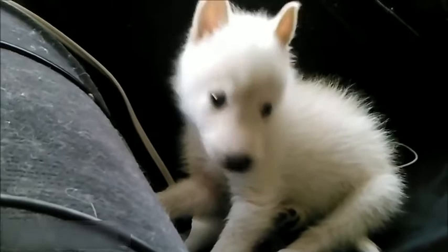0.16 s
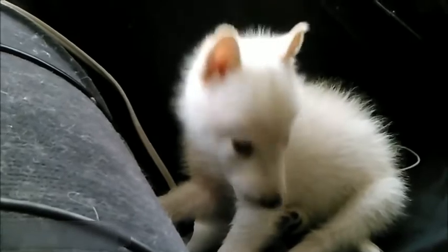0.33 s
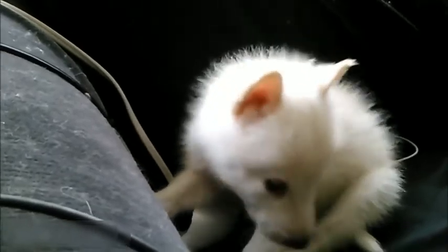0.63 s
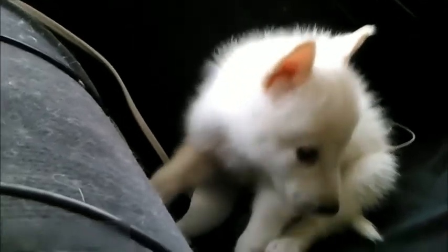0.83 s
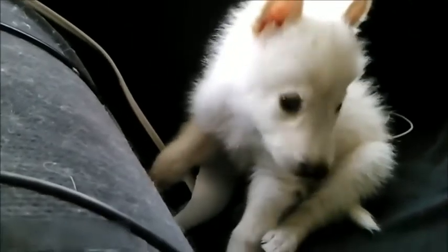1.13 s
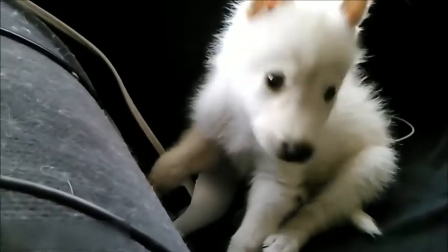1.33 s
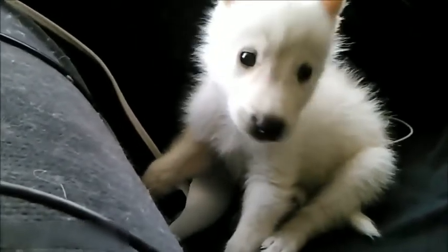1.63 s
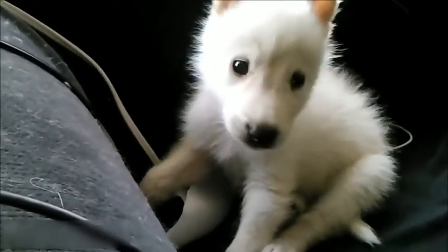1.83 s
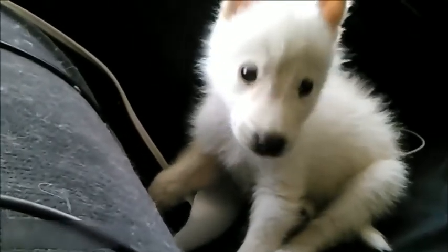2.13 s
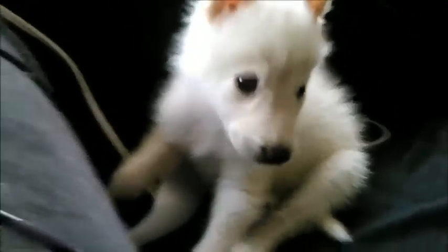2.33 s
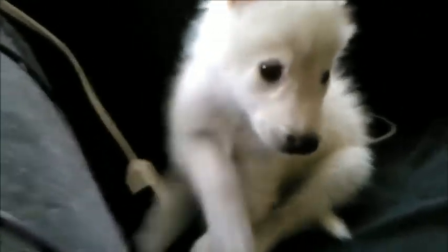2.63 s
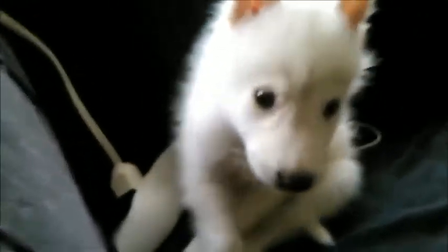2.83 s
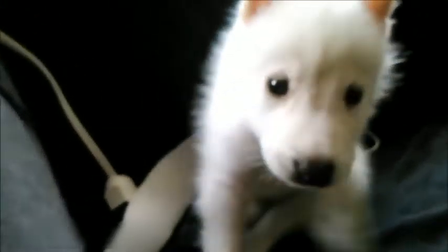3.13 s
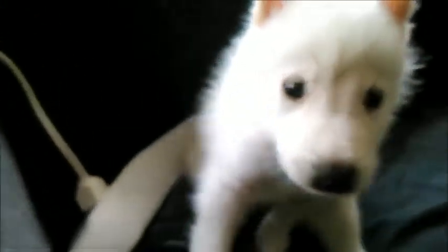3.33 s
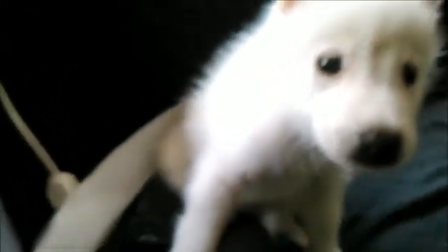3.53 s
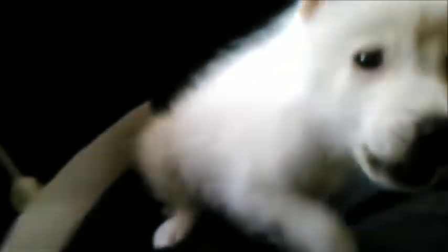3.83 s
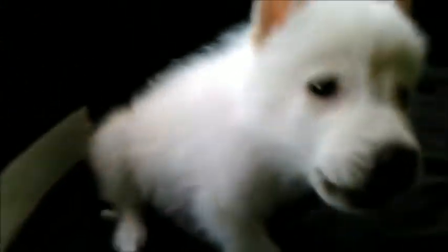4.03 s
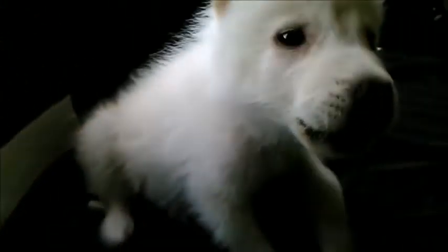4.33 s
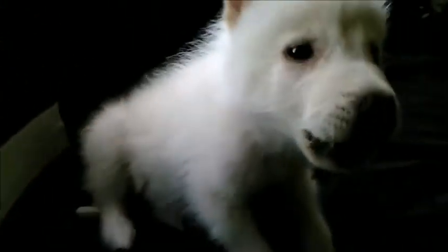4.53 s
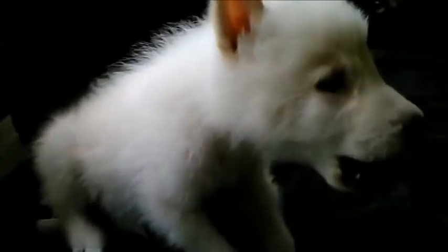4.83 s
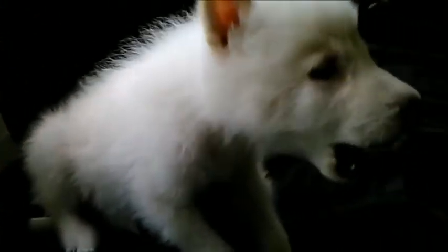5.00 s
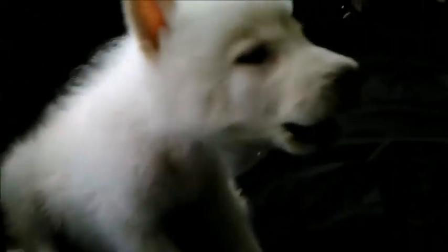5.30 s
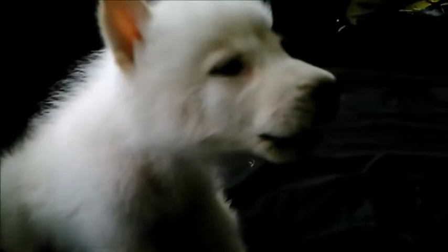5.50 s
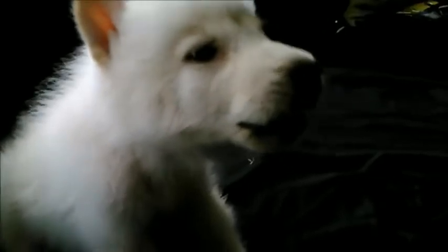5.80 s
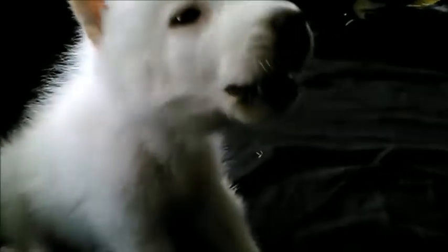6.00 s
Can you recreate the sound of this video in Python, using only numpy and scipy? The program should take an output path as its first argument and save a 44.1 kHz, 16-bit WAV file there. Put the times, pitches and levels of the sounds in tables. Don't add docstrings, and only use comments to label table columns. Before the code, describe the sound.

Soft bright rustling comes and goes over low room hiss, with dry ticks and a few muffled paw steps, busiest just before three seconds. Then a pup's muffled, fluttering whine swells into an open, wavering moan, leaps about an octave in uneven cracks, peaks piercingly and glides down more quietly. Close, dry small-room sound, limited in the highest treble, the loudest moment overloading.

```python
import sys
import numpy as np
from scipy import signal
from scipy.fft import rfft, irfft
from scipy.io import wavfile
from scipy.ndimage import uniform_filter1d

SR = 44100
rng = np.random.default_rng(int(sys.argv[2]) if len(sys.argv) > 2 else 0)


def field_ratio(decibels):
    return 10 ** (np.asarray(decibels, dtype=float) / 20)


def master_out(mix):
    frames = np.transpose(np.atleast_2d(mix))
    ceiling = np.clip(frames, -1, 1)
    pcm = np.round(ceiling * 32767).astype(np.int16)
    wavfile.write(sys.argv[1], SR, pcm)


N = 271425
T = np.arange(N) / SR


def evened(x):
    return x / np.sqrt(np.mean(x ** 2) + 1e-20)


def columns(rows, t):
    s, *rest = np.transpose(rows)
    return [np.interp(t, s, column) for column in rest]


def add(mix, s, sound):
    part = mix[round(s * SR):][:len(sound)]
    part += sound[:len(part)]


def coloured(x, points):
    hz, db = np.transpose(points)
    bins_hz = np.fft.rfftfreq(len(x), 1 / SR)
    gain_db = np.interp(np.log(bins_hz + 1), np.log(hz + 1), db)
    return irfft(rfft(x) * field_ratio(gain_db), len(x))


def peak(hz, centre_hz, width_hz):
    return 1j * width_hz * centre_hz / (centre_hz ** 2 - hz ** 2 + 1j * hz * width_hz)


# pitch_hz, level_db (per Hz)
AIR = [(12, -21.5), (20, 2.5), (47, -1.5), (92, -10), (185, 1), (322, -10), (463, -7), (562, -12.5),
       (953, -7.5), (2080, -19), (3240, -26.5), (5200, -24), (9060, -17.5), (11300, -26), (15400, -23)]
AIR_DB = -49


def air():
    swell = evened(uniform_filter1d(rng.standard_normal(N), size=6000))
    return field_ratio(AIR_DB + .5 * swell) * evened(coloured(rng.standard_normal(N), AIR))


# peak_s, peak_db, rise_s (over 20 dB), fall_s (over 20 dB),
# scrape_db (low scrape beside the hiss)
STROKES = [(.1, -63.5, 0.2, 0.33, -8.5), (.64, -43.5, 0.2121, 0.31, -14.5), (.91, -35, .11, .14, -25),
           (0.965, -34.5, 0.08, 0.08, -25), (1.02, -37, .1, .07, -25), (1.1, -45, .2, .09, -25),
           (1.205, -41.5, 0.05, 0.16, -23.5), (1.4, -46, 0.25, 0.27, -13), (1.56, -47, 0.24, 0.25, -16.5),
           (1.76, -46, .25, 0.13, -19), (1.95, -48.5, 0.29, 0.17, -20), (2.3, -46, 0.1, 0.23, -11.5),
           (2.51, -36, 0.1522, 0.11, -20), (2.647, -36, .04, .06, -10), (2.673, -33, 0.05, 0.02, -10),
           (2.688, -27.5, .012, .025, -12), (2.732, -36, .02, .04, -8), (2.762, -34, 0.03, 0.04, -11),
           (2.94, -45.5, .5, 0.56, -6), (3.53, -36, 0.35, 0.16, -4.5), (3.8, -47.5, .5, 0.04, -6),
           (3.83, -48.5, 0.0481, 0.025, 9.5), (3.87, -47.5, -0.33, -0.3, -14.5)]


def strokes():
    hiss, scrape = 0, 0
    for s, db, rise_s, fall_s, scrape_db in STROKES:
        power = field_ratio(db - 20 * np.maximum((s - T) / rise_s, (T - s) / fall_s)) ** 2
        hiss = hiss + power
        scrape = scrape + power * field_ratio(scrape_db) ** 2
    return np.sqrt(hiss), np.sqrt(scrape)


def fibre_slips():
    size_db = 2.0 * np.minimum(rng.exponential(1, N), 5)
    return rng.standard_normal(N) * field_ratio(size_db) * (rng.random(N) < .25)


# pitch_hz, level_db (per Hz)
CLOTH = [(880, -54), (1500, -10), (1640, -26), (1740, -36.5), (2030, -42), (2460, -50.5), (2560, -36),
         (4820, -24), (8740, 3.5), (10100, 0.5), (15400, -38.5)]


def rustle():
    hiss_level, scrape_level = strokes()
    clumps = field_ratio(2.05 * evened(uniform_filter1d(rng.standard_normal(N), size=1600)))
    hiss = evened(coloured(fibre_slips(), CLOTH))
    scrape_colour = [(1200, -23.5), (2500, -13.5), (4000, -1.5), (5500, -3.0), (8000, -12.5)]
    scrape = evened(coloured(fibre_slips(), scrape_colour))
    return clumps * (hiss_level * hiss + scrape_level * scrape)


# start_s, peak_db, pitch_hz, tail_ms, spread_octaves
SNAPS = [(0.144, -38, 6600, 8, .5), (0.333, -37, 9200, 3.0, 1.), (0.36, -38.5, 8100, 4.7, 1.),
         (0.8683, -30, 8900, 6, .8), (0.9652, -24, 8660, 3.0, .8), (.978, -23, 8800, 2.5, .8),
         (1.071, -33, 9500, 3., .7), (1.1428, -37, 10100, 3.0, .5), (1.271, -42, 5200, 3., 1.2),
         (1.3279, -33, 9000, 2.5, .9), (1.3477, -38, 6500, 2.5, 1.8), (1.408, -38, 7500, 3., 1.),
         (1.5374, -39, 5000, 3.0, 1.8), (1.5812, -32, 9800, 2.7, .7), (1.775, -33, 8900, 3.0, 1.),
         (1.865, -36, 7030, 3.7, 1.), (1.8843, -32.5, 10100, 3.0, 1.), (1.932, -27, 9430, 4, 1.),
         (2.603, -32.5, 9060, 3.0, 1.), (2.629, -30, 9200, 3.0, 1.), (2.659, -28, 10500, 2., 1.),
         (2.6808, -13.5, 8540, 3.0, 1.2), (2.7035, -17, 8060, 12, 1.3), (2.7495, -21, 8650, 5, .8),
         (2.754, -24, 8650, 3., .8), (2.7935, -20, 8600, 2.5, 1.2), (2.7968, -12, 8520, 3.2, 1.2),
         (2.802, -25, 9000, 7, 1.), (3.0094, -28.5, 10170, 3.9, 1.), (3.781, -25, 9293, 4, 1.),
         (3.8118, -24.5, 9120, 2.2, 1.), (3.8336, -24, 7000, 3.0, 1.6), (3.9, -21, 6720, 7.8, 1.),
         (4.8133, -13, 9800, 4.1, .55)]
# start_s, peak_db, pitch_hz
THUDS = [
    (1.24, -38, 110),
    (1.313, -28, 107.2),
    (1.35, -36, 120),
    (2.819, -31, 79.6),
]


def snaps():
    out, t = np.zeros(N), np.arange(2000) / SR
    skirts = [(-2, -38), (-.56, -14), (0, 0), (.33, -13), (.8, -36)]  # (spreads from the pitch, dB)
    for s, db, hz, tail_ms, wide in SNAPS:
        colour = [(hz * 2 ** (wide * step), skirt_db) for step, skirt_db in skirts]
        ring = coloured(rng.standard_normal(len(t)), colour)
        ring = ring * field_ratio(-20 * t * 1000 / max(tail_ms, .5)) * np.minimum(t / 0.00034, 1)
        add(out, s, field_ratio(db) * ring / abs(ring).max())
    for s, db, hz in THUDS:
        push = np.sin(2 * np.pi * hz * t) + .5 * np.sin(2 * np.pi * 2.86 * hz * t)
        add(out, s, -field_ratio(db - 60 * t / 0.0257) * push)
    return out


# start_s, pitch_hz
ONSET = [
    (3.33, 424.7),
    (3.352, 409.3),
]
# start_s, pitch_hz (folds taut), effort_db,
# pose (mouth pose 0-10, fractions lie between two poses)
HUM = [(3.335, 261.1, -51.5, 0), (3.35, 262, -38.5, 0), (3.39, 262.5, -37.5, 0), (3.43, 283, -37, 0),
       (3.47, 256.8, -36.5, 0.001), (3.61, 275.9, -33.5, 0.0067), (3.72, 254.1, -32.5, 0),
       (3.85, 258.8, -30, 0.002), (3.885, 280.8, -31, 0)]
MOAN = [(3.909, 275.3, -24, 0.849), (3.94, 282.1, -24, 1.006), (4.02, 291, -20.5, 1.883),
        (4.14, 268, -25.5, 2.583), (4.29, 266, -23, 2.92), (4.345, 225, -23, 2.97),
        (4.47, 243, -23.5, 3.464), (4.71, 244.4, -21, 4.14), (4.785, 305, -19.5, 4.055)]
BREAK = [(4.846, 320.3, -20, 4.06), (4.859, 526.5, -13.5, 5.01), (4.9, 571.7, -14, 4.92),
         (4.975, 588, -11, 5.924), (5.012, 620, -10, 6.01), (5.055, 623.1, -8.5, 6.107),
         (5.1, 677, -9.5, 6.839), (5.155, 691.2, -6, 6.919), (5.235, 704.7, -4.6, 6.96)]
FALL = [(5.315, 705, -5.1, 7.05), (5.345, 695, -9, 7.8), (5.63, 642.2, -19, 8.65), (5.76, 596.2, -21.5, 9),
        (5.82, 575.7, -22.5, 9.15), (5.865, 520.1, -24.5, 9.386), (5.995, 467, -28, 9.793),
        (6.056, 459.2, -25.5, 9.81), (6.16, 460.8, -24.5, 9.98)]
CALL = HUM + MOAN + BREAK + FALL
# first_s and last_s (slack moments), count, dip (share of pitch),
# sag_db (level), tighten_ms (slack to taut)
QUAVER_RUNS = [dict(first_s=3.374, last_s=3.879, count=15, dip=.065, sag_db=-1., tighten_ms=22)]
DIP_SPREAD, SAG_SPREAD_DB = .22, 1.37
# slack_s, slack_pitch_hz, tighten_ms, sag_db
WAVERS = [(3.915, 247, 25, 0.1), (3.951, 268, 17, 0.1), (3.985, 258, 25, -1), (4.02, 272, 28, -1),
          (4.06, 265, 28, -1), (4.098, 241, 27, -1), (4.136, 250, 29, -1), (4.174, 243, 23, -1),
          (4.213, 231, 24, 1.1), (4.252, 250, 23, -1), (4.294, 238, 23, -1), (4.342, 216, 18, .1),
          (4.37, 218, 30, -1), (4.41, 217, 25, -1), (4.447, 215, 25, -1), (4.49, 211, 25, -1),
          (4.527, 215, 26, .1), (4.57, 222, 25, -1), (4.61, 218, 27, .1), (4.65, 210, 25, -1),
          (4.69, 225, 20, .1), (4.728, 222, 29, -1), (4.767, 254, 23, -1), (4.807, 295, 15, -1)]
# slack_s, slack_pitch_hz, tighten_ms, sag_db
CRACKS = [(4.848, 328, 10.74, -2), (4.876, 496.4, 20.04, 1.5), (4.919, 523, 19.5, -0.5),
          (4.953, 445, 22, -1.0), (4.991, 440, 21, -2), (5.028, 470, 19.5, -0.4), (5.063, 512, 15, -0.6),
          (5.099, 618.9, 16.6, 0.2), (5.136, 617.6, 14.3, -0.5), (5.174, 642.5, 21.3, -3.5),
          (5.207, 669.7, 28.7, -2.5), (5.249, 640.6, 24.3, -3)]


def taut_hz(s):
    return columns(CALL, s)[0]


def quaver(t):
    rows = []
    for run in QUAVER_RUNS:
        s = np.linspace(run["first_s"], run["last_s"], run["count"])
        deep, weak = rng.standard_normal((2, run["count"]))
        dip = run["dip"] * (1 + DIP_SPREAD * deep)
        slack_hz = taut_hz(s + run["tighten_ms"] / 2000) * (1 - dip)
        rows += zip(s, slack_hz, run["tighten_ms"] + 0 * s, run["sag_db"] + SAG_SPREAD_DB * weak)
    s, slack_hz, tighten_ms, sag_db = np.transpose(rows + WAVERS + CRACKS)
    taut_s = s + tighten_ms / 1000
    swings = np.stack([s, slack_hz, sag_db, taut_s, taut_hz(taut_s), 0 * s], axis=1).reshape(-1, 3)
    squeak = [(row[0], row[1], 0) for row in ONSET]
    slide = [(row[0], row[1], 0) for row in FALL]
    knots = np.concatenate([squeak, swings, slide])  # (s, Hz, sag dB)
    order = np.arange(len(knots))
    place = np.interp(t, knots[:, 0], order)
    rise = np.maximum(np.diff(np.log(knots[:, 1]), append=0), 0)[place.astype(int)]
    part = .45 * (place % 1) + .55 * (place % 1) ** (1 + 26 * rise ** 2)
    swinging = np.floor(place) + (1 - np.cos(np.pi * part)) / 2
    eased = np.where(t < FALL[0][0], swinging, place)
    return [np.interp(eased, order, knots[:, c]) for c in (1, 2)]


# pitch_hz, level_db (over effort)
SHUT = [(512, 0.22), (1300, -17), (2200, -45), (3000, -14), (4600, -22), (5400, -6.5), (8300, -12.5),
        (10600, -30), (12800, -24.5)]
GAPE = [(860, -1.05), (1600, -1.5), (2830, -20.5), (3000, -9), (4600, -13), (5400, -3), (8300, -11),
        (10600, -27.5), (12800, -22)]
OPEN = [(870, 0.28), (1685, -2), (2580, -17.5), (3300, -36), (4700, -19.5), (5850, -14), (7850, -15.5),
        (10350, -27), (12700, -33)]
ROUND = [(880, 0.37), (1570, -1.5), (2200, -14), (3500, -37), (4700, -21.5), (6200, -13), (8100, -14),
         (10400, -19), (13000, -20.5)]
DARK = [(900, 0.3), (1615, -3), (2200, -18.5), (3500, -34), (4700, -22), (6300, -18.5), (8200, -12.5),
        (11200, -41.5), (12900, -29)]
STRAIN = [(1068, -0.1), (1548, 5.5), (2280, -5), (3200, -29.5), (4300, -23), (5800, -15.5), (8300, -20),
          (11000, -35), (13000, -29.5)]
RASP = [(1040, 0.05), (1545, 0), (2240, -12), (3200, -34.5), (4200, -25.5), (6400, -24.5), (8300, -30),
        (11000, -58.5), (13000, -48)]
WIDE = [(1380, -0.06), (2060, -28.5), (2640, -20), (3450, -37), (4200, -28), (5600, -39), (8000, -23.5),
        (11000, -37), (13200, -35.5)]
EASING = [(1385, -0.26), (2060, -20.5), (2690, -26), (3400, -44), (4550, -16), (6800, -28), (7700, -17),
          (10900, -28), (13000, -29)]
CLOSING = [(1190, 0.2), (1860, -18), (2310, -5.5), (3200, -25), (4650, -13), (6900, -33), (7500, -28.5),
           (10400, -22), (12800, -24.5)]
NARROW = [(955, 0.56), (1400, -8.5), (1900, -7.5), (2900, -29.5), (4300, -23.5), (6500, -34.5), (7700, -30),
          (10800, -28.5), (12800, -33.5)]
POSE_SHAPES = [SHUT, GAPE, OPEN, ROUND, DARK, STRAIN, RASP, WIDE, EASING, CLOSING, NARROW]
POSE_WIDTHS = [520, 360, 384.4, 850, 915, 1000]
# chest_db (pure low tone over effort), rough (0-1), width_hz (first resonance),
# breathy (share of the bright part, 0-1)
VOICING = [(3.5, 0.19, 410, 0.91), (-3, 0.11, 141, 1), (-4, 0.13, 139, 1), (-3.5, 0.05, 133.5, 0.63),
           (-6, 0.09, 127, 0.53), (-12, 0.05, 160, 0.6), (-16.5, 0.06, 150, .9), (-14, 0.01, 133.2, .2),
           (-5, .016, 160, 0.1), (1.6, .018, 165, 0.22), (-11.5, 0.04, 203, 0.23)]
# pitch_hz, level_db (over effort)
POCKET = [(9500, -45), (7000, -24), (9300, -33), (7000, -26), (7200, -24), (9500, -38), (9500, -48),
          (9000, -38), (9400, -31), (9200, -31), (9300, -38)]
# centre_s, lost_hz
SLIPS = [(5.375, 12), (5.5, 9), (5.705, 6), (5.752, 18), (6.056, 14)]
# centre_s, lost_db
CATCHES = [(4.952, 10), (4.975, 14), (4.9905, 9), (5.011, 7), (5.0455, 9), (5.073, 5)]
SLIP_S, CATCH_S = .014, .0014
MOUTH_OPENS_S, SHUT_DB, SHUT_EDGE_HZ = 3.9, -26, 837


def howl():
    t = T[T > ONSET[0][0]]
    slow = t[::32]
    _, effort_db, pose = columns(CALL, slow)

    def posed(rows):
        return columns([(p, *row) for p, row in enumerate(rows)], pose)

    chest_db, rough, width, breathy = posed(VOICING)
    modes = [posed([shape[k] for shape in POSE_SHAPES]) for k in range(len(SHUT))]
    (first, first_db), (second, second_db), (third, third_db), *mouth = modes
    pocket, pocket_db = posed(POCKET)

    hz, sag_db = quaver(t)
    hz = hz - sum(lost * np.exp(-((t - s) / SLIP_S) ** 2) for s, lost in SLIPS)
    caught = field_ratio(-sum(lost_db * np.exp(-((slow - s) / CATCH_S) ** 2) for s, lost_db in CATCHES))
    wobble = evened(uniform_filter1d(uniform_filter1d(rng.standard_normal(len(t)), size=150), size=150))
    hz = hz * (1 + .06 * np.interp(t, slow, rough) * wobble)
    slow_hz = hz[::32]
    turns = np.cumsum(hz) / SR

    shut = np.clip((MOUTH_OPENS_S - slow) / .022 + .5, 0, 1)
    edge = shut * SHUT_EDGE_HZ + (1 - shut) * 1.1136 * third
    share = np.clip(breathy, 0, 1)
    alike = .6
    puff, drift, voice = 0, 0, 0
    for k in range(1, 70):
        f = k * slow_hz
        fresh = rng.standard_normal(len(slow)) + 1j * rng.standard_normal(len(slow))
        calm = np.convolve(fresh, np.ones(3) / np.sqrt(3), "same")
        fresh = np.where(slow_hz < 400, calm, fresh)
        puff = alike * puff + np.sqrt(1 - alike ** 2) * fresh

        low = field_ratio(first_db + 4) * peak(f, first, width)
        low += field_ratio(chest_db - 1.0) * (1 - shut) * peak(f, 675.8, 73)
        throat = field_ratio(second_db) * peak(f, second, 113.1) - field_ratio(third_db) * peak(f, third, 150.7)
        low -= field_ratio(SHUT_DB * shut + 6) * throat
        low *= (1 + rough * calm * f / 1100) / (1 + (f / edge) ** 14)

        upper = 0j
        for m, (centre, db) in enumerate(mouth):
            upper = upper + (-1) ** m * field_ratio(db) * peak(f, centre, POSE_WIDTHS[m]) ** 2
        upper += 1j * field_ratio(pocket_db) * peak(f, pocket, 700) ** 2
        upper += field_ratio(-43) * np.clip(pose - 6, 0, 1) * peak(f, 15200, 400) ** 2
        upper *= field_ratio(SHUT_DB * shut) * np.sqrt(slow_hz / 700) * (f < 15500)
        drift = 0.435 * drift + 0.905 * evened(uniform_filter1d(fresh.real, size=170))
        upper *= field_ratio(3.254 * drift)

        airy = share * np.clip(f / 7500, 0, 1) ** 3
        gain = caught * (low + upper * (np.sqrt(1 - airy) + np.sqrt(airy) * puff))
        if k == 1:
            gain = field_ratio(chest_db - 0.5) + 0j
        strength = np.interp(t, slow, field_ratio(effort_db) * gain)
        voice = voice + (strength * np.exp(2j * np.pi * k * turns)).real
    out = np.zeros(N)
    fade_in = np.clip((t - t[0]) / 0.013, 0, 1)
    add(out, t[0], -fade_in * field_ratio(sag_db) * voice)
    return out


def room(x, t60_s=.13, wet_db=-22):
    t = np.arange(8000) / SR
    sparse = rng.choice([-1., 1.], len(t)) * (rng.random(len(t)) < .05)
    taps = sparse * field_ratio(-60 * t / t60_s) * (t > .003)
    return x + field_ratio(wet_db) * signal.oaconvolve(x, taps / np.linalg.norm(taps))[:N]


def scene():
    return (room(howl()) + rustle() + snaps() + air())[None]


def masked(x, under_db=-60, cut_db=-30, top_db=7):
    hz, _, z = signal.stft(x, SR, nperseg=2048, noverlap=1536)
    power = abs(z) ** 2 + 1e-20
    near = abs(uniform_filter1d(uniform_filter1d(power, size=13, axis=1), size=3, axis=2))
    over_db = 10 * np.log10(near / power.sum(1, keepdims=True) + 1e-20) - under_db
    over_db += 12 * np.clip(1 - hz / 350, 0, 1)[:, None]
    over_db -= top_db * (np.clip((hz - 13800) / 800, 0, 1) - 2 * (hz > 14950))[:, None]
    kept = z * field_ratio(cut_db * np.clip(.5 - over_db / 3, 0, 1))
    return signal.istft(kept, nperseg=2048, noverlap=1536)[1][:, :N]


def top_cut(x):
    return signal.sosfilt(signal.butter(12, 15520, fs=SR, output="sos"), x)


def record(dry):
    clipped = np.clip(dry, -.94, .94)
    edge = signal.firwin(301, 15500, window=("kaiser", 9), fs=SR)
    limited = signal.oaconvolve(clipped, edge[None], "same")
    return top_cut(masked(limited))


dry = scene()
out = record(dry)
master_out(out)
```